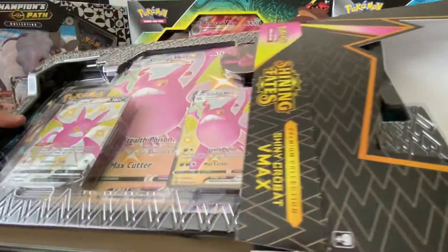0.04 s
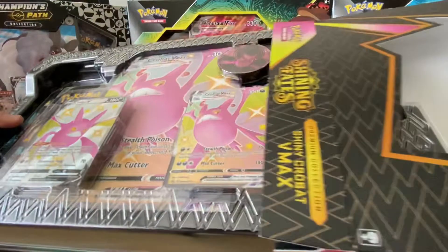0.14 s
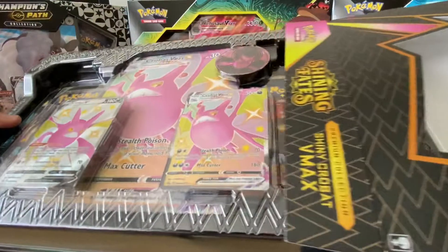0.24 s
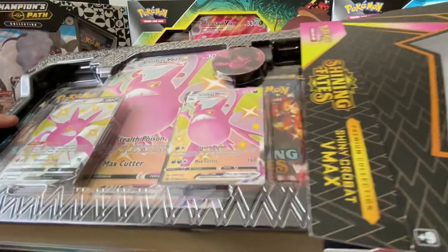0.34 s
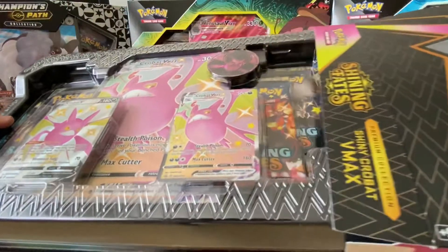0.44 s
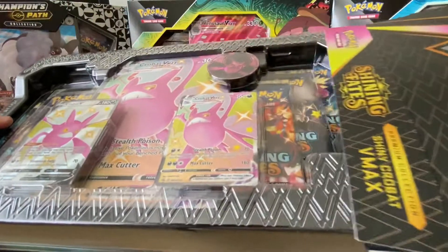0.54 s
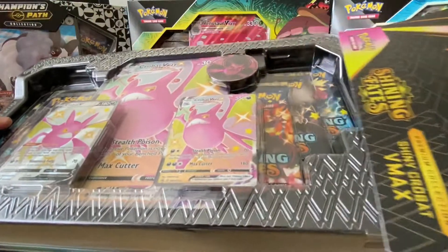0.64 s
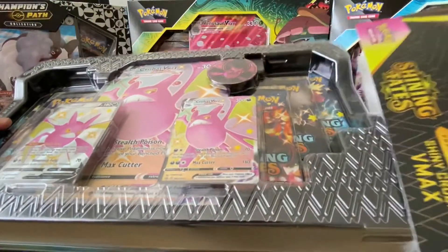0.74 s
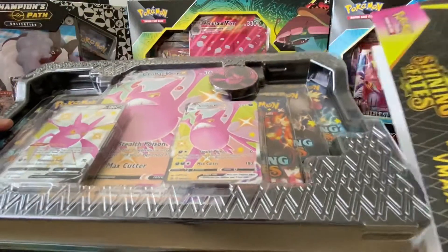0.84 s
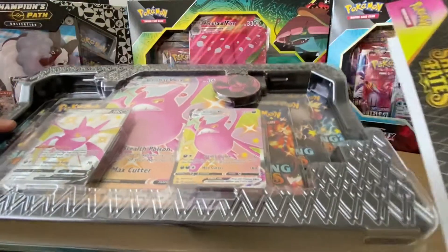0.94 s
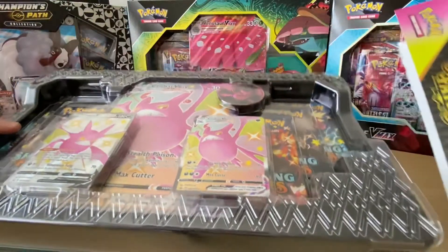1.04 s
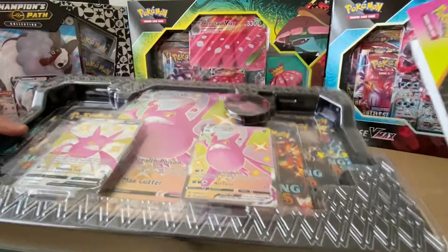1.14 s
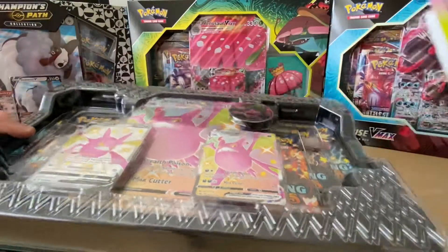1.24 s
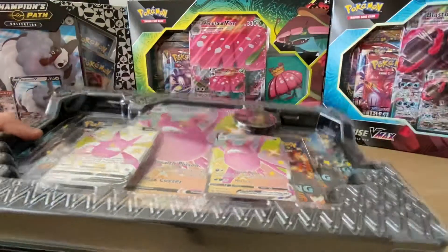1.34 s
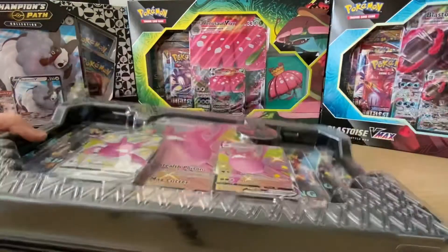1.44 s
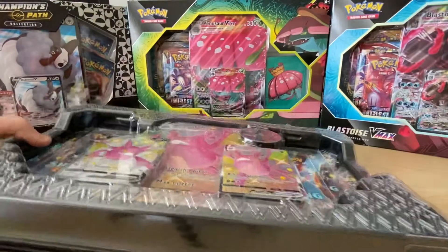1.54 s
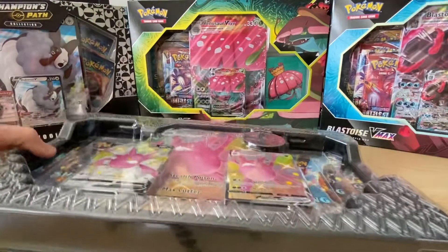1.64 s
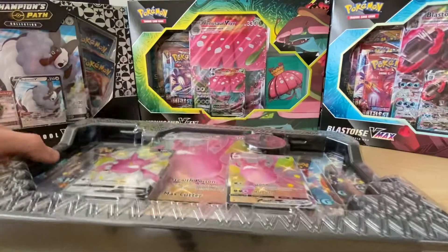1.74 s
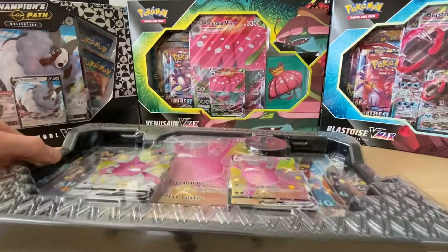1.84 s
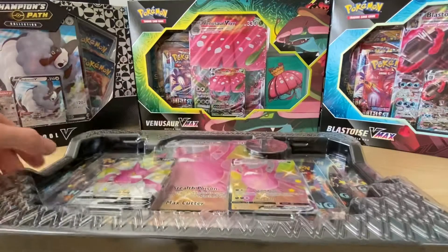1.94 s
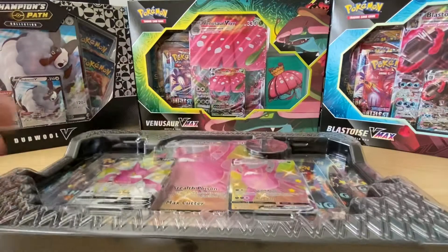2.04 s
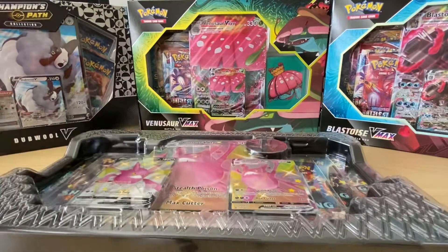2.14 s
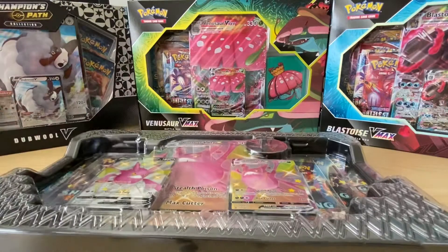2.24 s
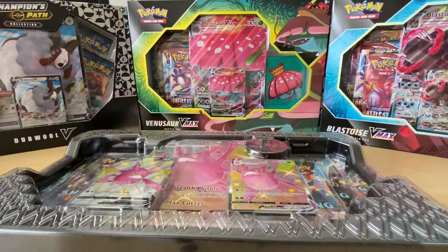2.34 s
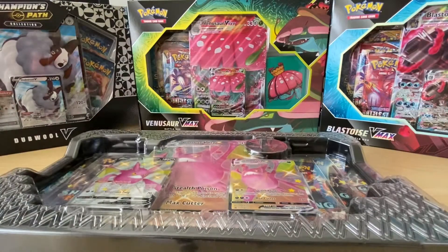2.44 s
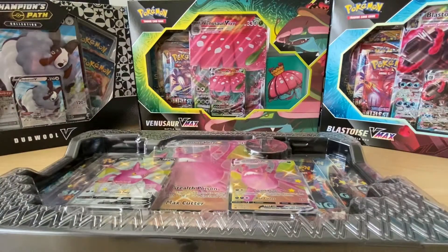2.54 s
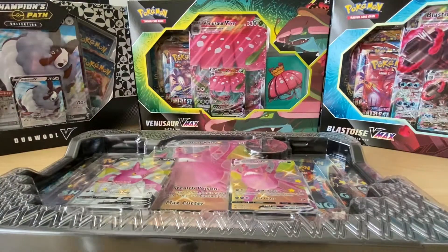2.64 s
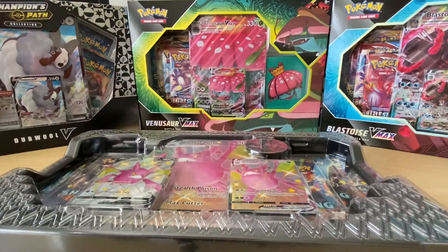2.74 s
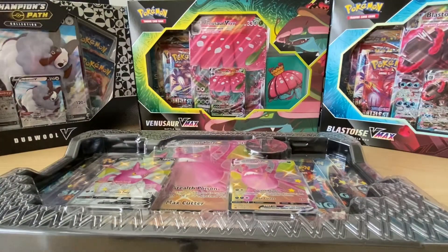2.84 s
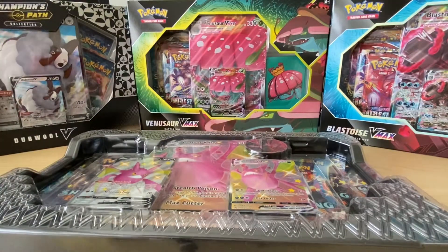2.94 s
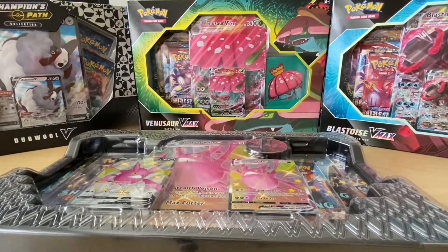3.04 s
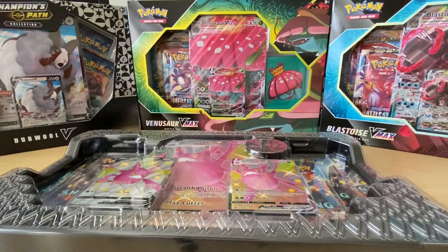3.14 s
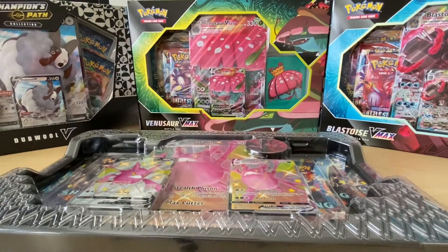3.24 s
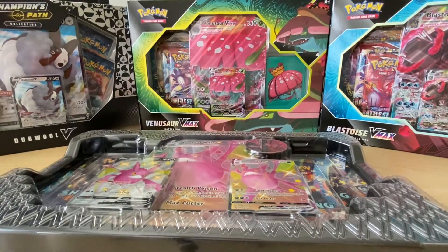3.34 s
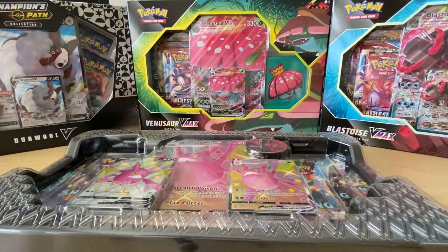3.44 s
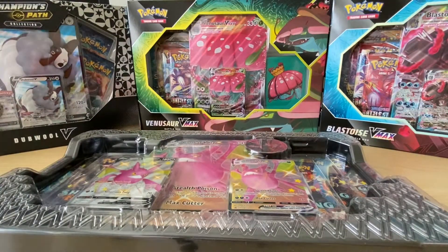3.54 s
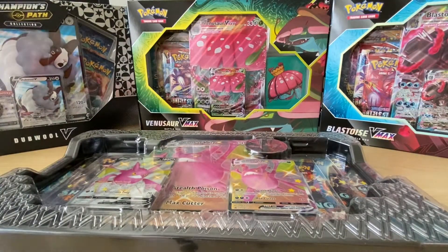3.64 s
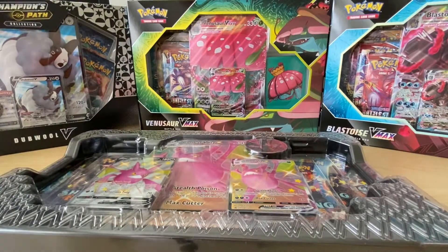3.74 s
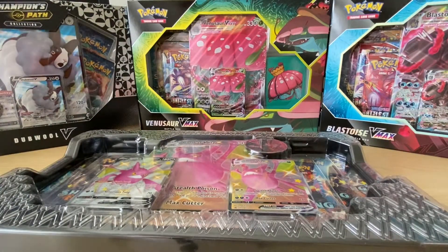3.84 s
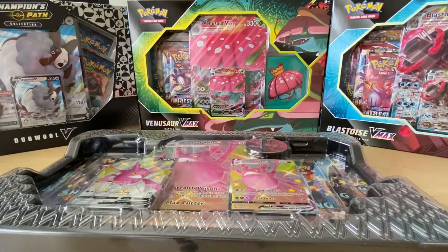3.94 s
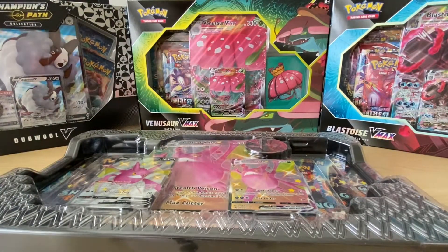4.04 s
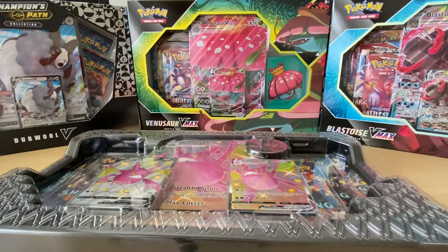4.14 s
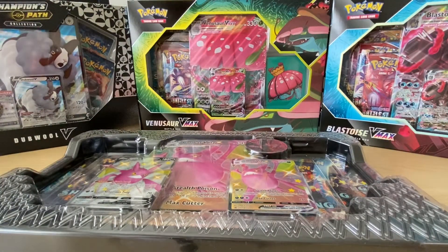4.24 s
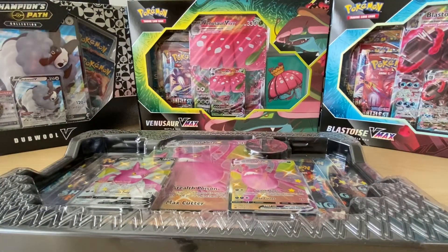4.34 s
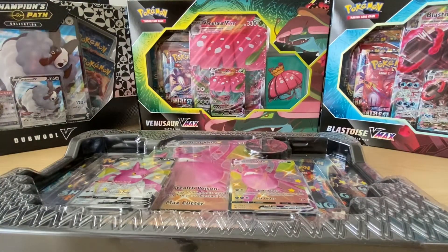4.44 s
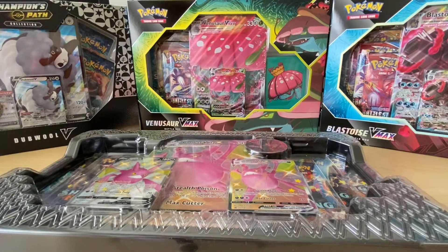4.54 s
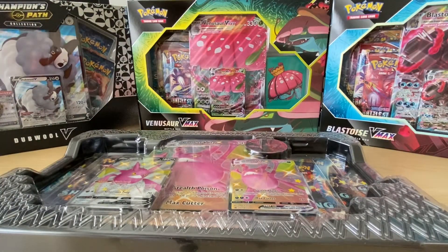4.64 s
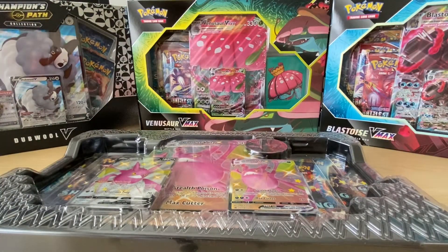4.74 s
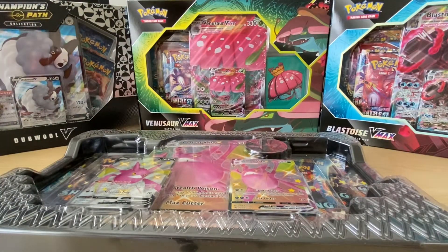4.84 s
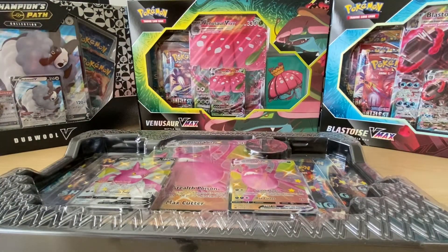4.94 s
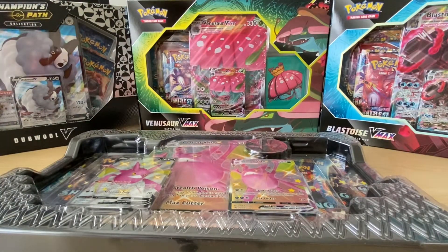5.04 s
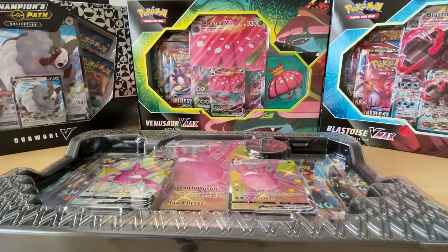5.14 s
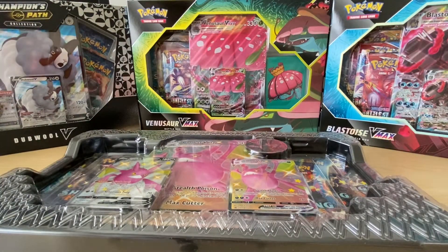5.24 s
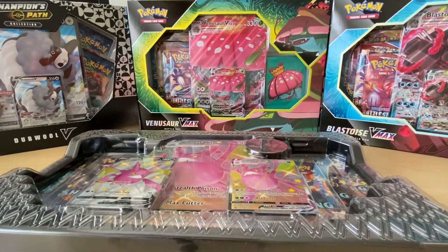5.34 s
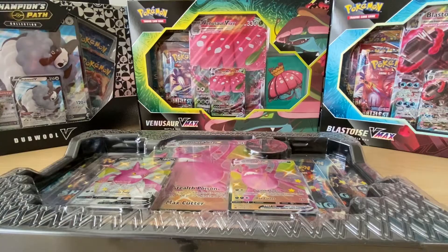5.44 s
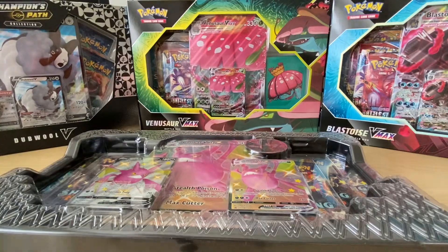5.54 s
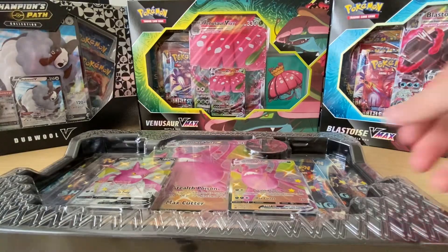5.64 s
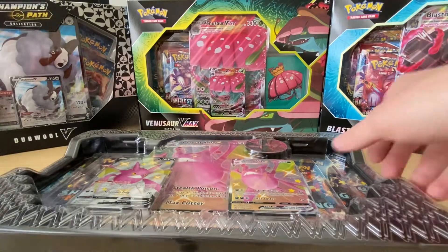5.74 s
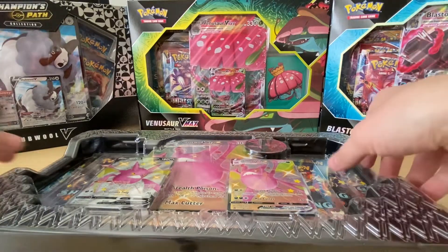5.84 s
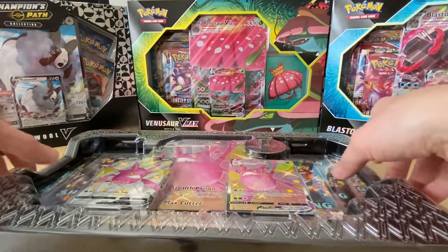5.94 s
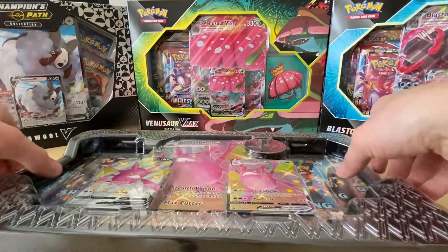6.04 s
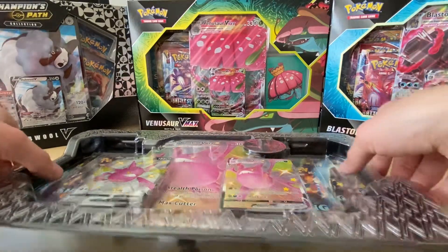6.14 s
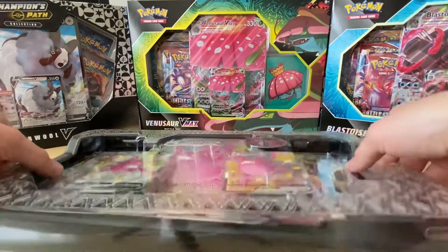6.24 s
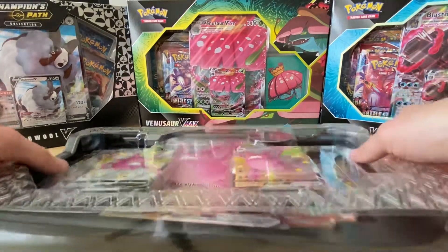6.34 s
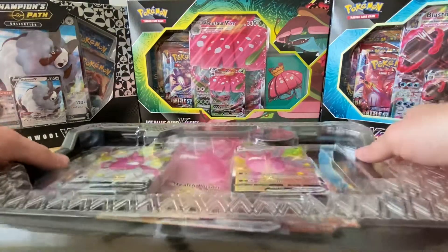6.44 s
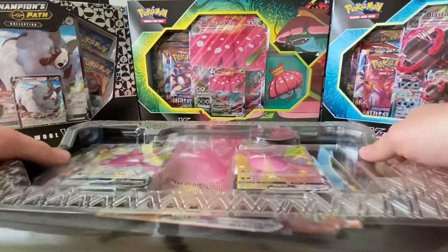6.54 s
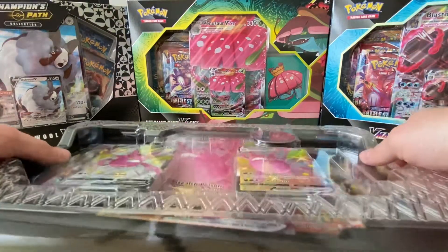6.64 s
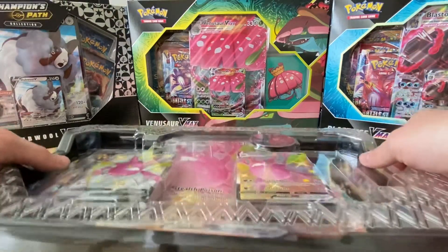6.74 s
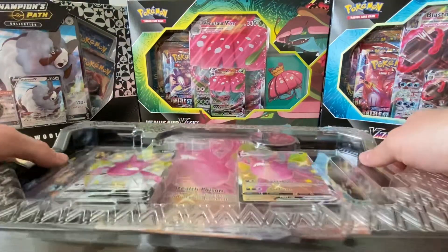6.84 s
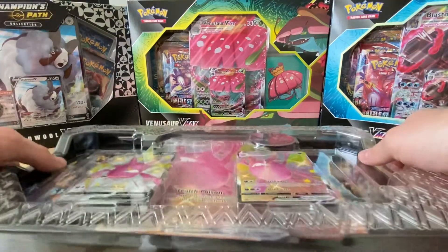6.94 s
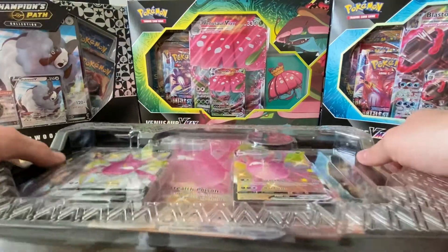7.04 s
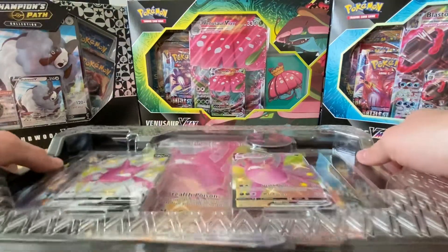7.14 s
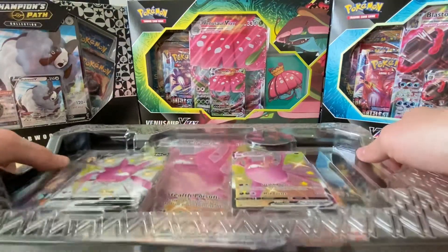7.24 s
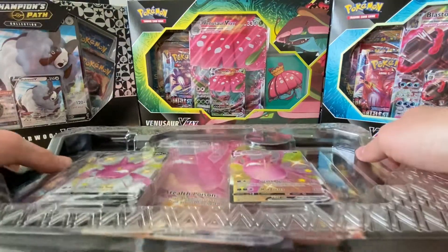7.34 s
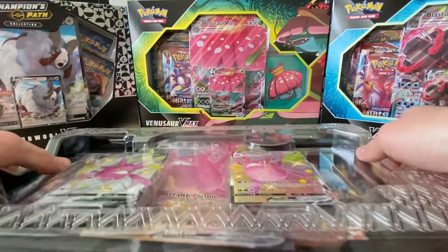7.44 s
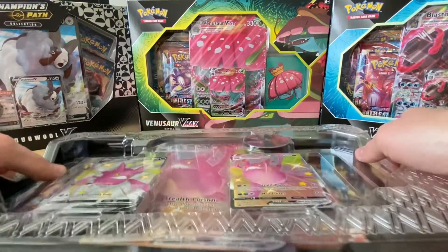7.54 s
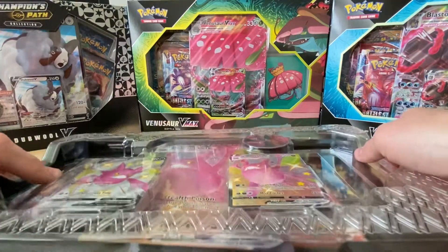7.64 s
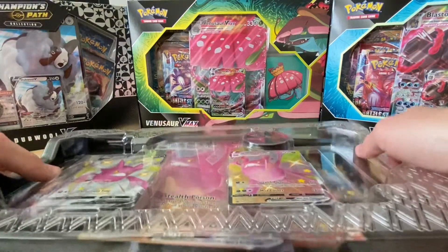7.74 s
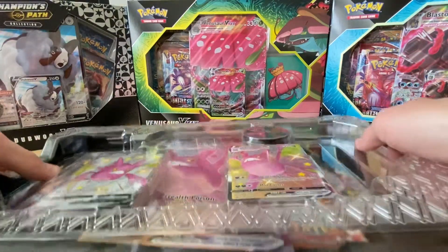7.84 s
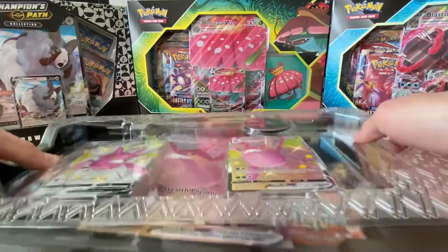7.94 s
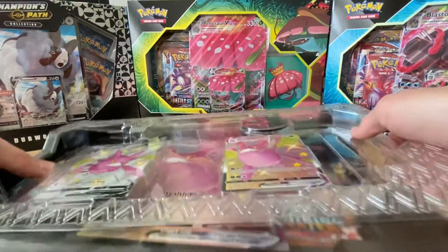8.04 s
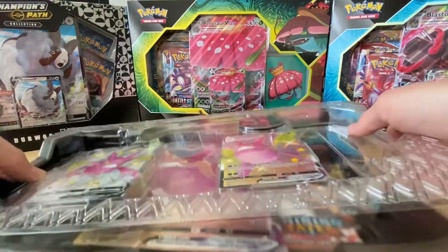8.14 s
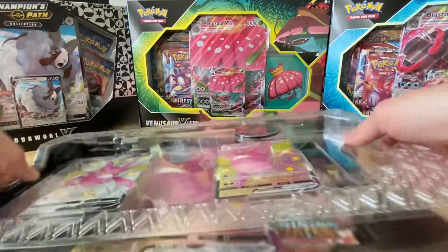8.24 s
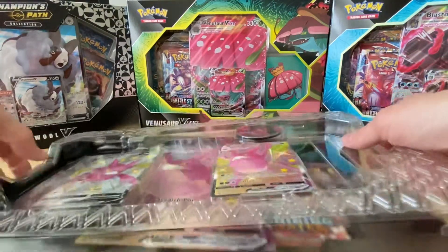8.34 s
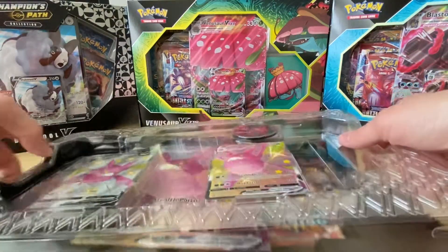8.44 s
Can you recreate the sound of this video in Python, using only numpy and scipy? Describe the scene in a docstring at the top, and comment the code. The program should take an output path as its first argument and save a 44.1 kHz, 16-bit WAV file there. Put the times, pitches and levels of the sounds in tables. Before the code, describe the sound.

A stiff plastic tray slides out of a cardboard sleeve with a dry, hissing scrape and a sharp knock. The sleeve is dragged and bumped about, giving hollow knocks, brief scuffs and low thuds on a table. Then fingers pry at the tray's lid, which rubs, ticks and pops in irregular snaps. It is all heard close up in stereo in a small, quiet room.

```python
"""A plastic tray and its cardboard sleeve

A stiff tray is drawn out of its sleeve and set on a table; the sleeve is knocked about and put away
to one side, then fingers pry at the tray's lid, which snaps and creaks. Friction is a dense train of
micro-slips, heard as rasp, rumble and hiss. Knocks and snaps are bursts of force that excite the damped
modes of card, plastic and table. Two spaced microphones listen in a small, quiet room."""
import sys
import numpy as np
from scipy import signal
from scipy.fft import rfft, irfft, next_fast_len
from scipy.io import wavfile
from scipy.ndimage import uniform_filter1d, map_coordinates

SR = 44100
rng = np.random.default_rng(int(sys.argv[2]) if len(sys.argv) > 2 else 0)


def bounce(signal):
    """Save signal as a 16-bit WAV file at the path given by the first command-line argument."""
    frames = np.transpose(np.atleast_2d(signal))
    limited = np.clip(frames, -1, 1)
    pcm = np.round(limited * 32767).astype(np.int16)
    wavfile.write(sys.argv[1], SR, pcm)


N = 373652

# Normal modes. Each row: frequency in Hz, bandwidth in Hz, level in dB.
TABLE_MODES = [(57, 6.4, -18), (84, 33, -1), (131.8, 16.6, 2.5), (167, 27, -2), (220, 16, 1.5),
               (264.4, 162, -6.5)]
CARD_MODES = [(313.7, 26, 0), (373.7, 23.3, 5), (425.1, 40, 4.5), (477.2, 22.5, 3.5), (521.2, 45, 1.5),
              (577.2, 24, 2), (726, 15, -17), (825.5, 133, 2), (1057.4, 350, -1), (1261, 61, 0),
              (1430, 210, -4.5), (2073, 140, -0.5), (2750, 250, -1)]
PLASTIC_MODES = [(493.2, 74, 2), (615.3, 65, 7), (921, 107, 7.5), (1066.7, 170, 0.5), (1240, 20, 0),
                 (1385, 53, -6), (1603, 300, -7), (2330, 330, -3), (3250, 400, 8.5)]
# Noise spectra. Each row: frequency in Hz, gain in dB.
AIR_SPECTRUM = [(18, -45), (30, 7), (122, -4), (296, -5), (346, -8.5), (394, 0), (905, -13), (1340, -5.5),
                (1440, -12.5), (3070, -31), (9640, -29), (13900, -66), (15000, -59)]
RASP_SPECTRUM = [(120, -67.5), (200, -8.5), (275, 3), (452, 2), (720, 8), (934, 2.5), (1180, 5),
                 (3000, -12.5), (3900, -39.5), (6600, -120)]
HISS_SPECTRUM = [(600, -44), (1180, -7), (2000, -3), (2140, -0.5), (3020, -4.5), (4060, -6.5), (6620, -6.5),
                 (7450, -12.5), (8820, -9.5), (12700, -14.5), (14100, -18.5), (15000, -57)]
CARD_CRACK_SPECTRUM = [(500, -33), (1180, -1), (2000, -12), (2240, -8), (3150, -18.5), (3670, -11),
                       (5890, -13.5), (6520, -12.5), (13200, -25), (15500, -54.5)]
SCUFF_SPECTRUM = [(500, -19), (1180, 0.5), (2600, -7), (3350, -2), (3900, -9), (5900, -10.5), (7850, -9.5),
                  (9050, -7.5), (9950, 3), (10850, -10), (13300, -18), (14200, -61)]
PLASTIC_CRACK_SPECTRUM = [(600, -40), (1180, -9), (2000, -0.5), (3100, -6), (4400, -4.5), (7660, -4.5),
                          (13100, -10.5), (15000, -26), (16300, -39)]
# The tray sliding out, with one catch on the way, and the fingers working at the lid.
# Each row: time in seconds, then rasp, rumble and hiss levels in dB.
TRAY_PULL = [(0.0, -42.5, -53, -44), (0.12, -42.5, -58, -44), (0.22, -40.5, -60, -43.5),
             (0.26, -43.5, -67, -39.5), (0.33, -38, -64, -39.5), (0.385, -40, -59.5, -39),
             (0.41, -36, -65, -41), (0.46, -44.5, -58.5, -47.5), (0.57, -46, -58, -49.5),
             (0.64, -40.5, -73.5, -41.5), (0.7, -37, -49, -37.5), (0.78, -36, -43.5, -30.5),
             (0.815, -29, -37, -37.5)]
LID_GRIP = [(5.893, -43, -45.5, -46), (5.97, -62.5, -52, -68), (6.1, -45.5, -52, -50.5),
            (6.29, -44.5, -60, -53), (6.48, -59.5, -65, -72.5), (6.73, -48.5, -59, -62),
            (6.9, -53.5, -64, -60.5), (7.07, -49.5, -56, -59), (7.35, -53, -56.5, -57.5),
            (7.47, -47, -56, -56.5), (7.68, -52, -51, -54), (7.79, -52.5, -68, -59.5),
            (7.9, -51, -50.5, -67), (8.11, -48.5, -45.5, -56), (8.22, -50, -51, -45),
            (8.36, -48, -41.5, -56.5), (8.47, -45, -52, -41.5)]
# Strokes of the dragged sleeve. Each row: start and length in seconds, first and last rasp level in dB,
# rumble and hiss in dB above the rasp.
SLEEVE_DRAGS = [(1.123, 0.03, -68, -65, 13.5, -24), (1.21, 0.68, -57.5, -54, -5, -3.5),
                (1.48, 0.26, -67, -43.5, -14, -1.5), (1.79, 0.098, -54, -31.5, -18, -1.5),
                (2.424, 0.097, -53, -42.5, -15, -7.5), (2.63, 0.11, -31, -56, -7, -12.5),
                (2.77, 0.096, -43, -46, -7, -7.5), (3.171, 0.092, -39.5, -48.5, -20, -2.5),
                (4.05, 0.54, -64.5, -78, -3, 1.5), (4.6, 0.31, -61.5, -68, 3, -4.5),
                (5.13, 0.095, -53, -44, 0.5, -3), (5.274, 0.11, -40.5, -43, 0, -9.5),
                (5.649, 0.31, -68, -80, 20, 6)]
# Hands barely moving. One row: rasp, rumble and hiss levels in dB.
RESTING_HANDS_DB = (-72.5, -66.5, -80.5)
# The sleeve's mouth singing as the tray leaves, and fingers squeaking on the lid.
# Each row: time in seconds, level in dB, centre frequency in Hz.
SLEEVE_SCRAPE = [(0.0, -61, 4300), (0.2, -54, 4000), (0.34, -49, 4800), (0.45, -59, 4100),
                 (0.66, -58, 3300), (0.72, -50, 3700), (0.8, -41, 5000)]
LID_SQUEAK = [(5.76, -73, 11700), (5.81, -69, 11600), (5.88, -65, 11500), (5.95, -62, 11700),
              (6.0, -69, 11300), (6.05, -63, 11500), (6.1, -72, 11500)]
# Card and tray bumping. Each row: time in seconds, ring peak in dB, relative thud and crack levels in dB,
# ring and thud pitches in Hz, contact time in ms, purity of the ring in dB per octave.
KNOCKS = [(0.547, -30, -60, -52, 700, 250, 4.3, -6), (0.592, -9.5, -39, -33.5, 500, 299, 5.8, 0),
          (0.661, -24, -45, -41, 800, 250, 12, 10), (0.789, -29, -60, -31, 800, 214, 14, 6),
          (0.811, -19, -31, -33, 1040, 192, 8.6, -3), (1.117, -31.5, -49, -47, 455, 99, 17, 6.5),
          (1.235, -45, -56, -57, 800, 155, 6.3, 12), (1.253, -35, -59, -64, 574, 155, 7.6, 13),
          (1.3, -35.5, -66, -57, 1200, 155, 2.7, 8), (1.44, -23.5, -30, -39.5, 301, 288, 5.5, 2),
          (1.519, -45, -45.5, -50, 586, 150, 11, 19), (1.725, -34.5, -48.5, -51, 606, 280, 9.2, 18),
          (1.872, -18.5, -29.5, -30, 366, 237, 29, 7), (1.896, -11, -23.5, -51, 312, 272, 5.9, 12.5),
          (2.415, -21, -37.5, -40, 452, 130, 45, 5.5), (2.527, -28, -30.5, -35, 410, 89, 10.3, 27),
          (2.611, -18, -37, -28, 900, 155, 19, 5), (2.619, -7, -35, -35, 510, 130, 18.3, 14),
          (3.165, -20, -23, -32, 427, 120, 23.6, 19), (3.284, -34, -58, -40.5, 493, 134, 32, 2),
          (4.101, -37, -52, -60, 355, 252, 18, 2), (4.592, -30, -43.5, -51.5, 437, 213, 26, 6),
          (4.767, -38, -51.5, -56, 412, 56.5, 26, 4), (5.079, -24, -35.5, -49.5, 370, 157, 36, 3.5),
          (5.255, -37, -52, -59, 423, 217, 63, 29), (5.308, -20.5, -34, -40.5, 408, 246, 20, 28),
          (5.36, -30.5, -45, -64, 426, 242, 93, 42), (5.642, -38, -58, -51.5, 606, 242, 19, 12),
          (5.716, -37.5, -51, -70, 580, 225, 8.1, 23), (6.336, -53, -39, -48, 301, 143, 5.6, 1),
          (8.266, -18, -36.5, -43, 563, 250, 4.7, 15)]
# The table top under heavier bumps. Each row: start in seconds, peak in dB, pitch in Hz, decay in ms.
TABLE_SWAYS = [(0.825, -43, 71.5, 30), (1.136, -44, 76.5, 37), (1.444, -50, 71, 20),
               (1.892, -26.5, 54.6, 18.6), (2.523, -26, 57.5, 25), (3.168, -26, 52.6, 33),
               (4.599, -46, 55.6, 43), (4.768, -46, 52, 18), (5.09, -41, 61.4, 78), (5.32, -37.5, 58.7, 36),
               (8.269, -36, 44.7, 17)]
# Glossy card slipping. Each row: start in seconds, relative level in dB, decay in ms.
CARD_SCUFFS = [(2.826, -31.5, 60), (3.0795, -38, 49), (4.045, -41, 127), (4.262, -42, 24),
               (4.6094, -42.5, 56), (5.147, -39, 51)]
# The plastic buckling. Each row: time in seconds, ring peak in dB, relative crack level in dB,
# ring pitch in Hz, contact time in ms, tilt of the crack in dB per octave.
SNAPS = [(3.479, -51, -73, 1180, 3.8, 1), (3.756, -75, -64, 434, 18, 0), (3.926, -48, -59.5, 433, 40, -3),
         (5.891, -23, -49, 950, 10, 4), (5.906, -35, -32.5, 303, 22, 0.5), (5.924, -34, -51, 600, 6.2, -5),
         (6.228, -37, -47, 923, 3.6, 5), (6.237, -26, -33.5, 930, 8.9, -5.5), (6.428, -37, -46, 665, 6, -7),
         (6.438, -22, -33, 680, 24, -6.5), (6.678, -24, -29.5, 930, 10, 0),
         (6.757, -19.5, -34, 910, 11, 1.5), (6.763, -18.5, -32, 915, 7.3, -3),
         (6.792, -14, -24.5, 637, 6.9, -3.5), (7.058, -28.5, -46, 945, 16, -6),
         (7.146, -10.5, -30, 850, 10, 0), (7.182, -22.5, -26.5, 1010, 8.2, 1.5),
         (7.331, -25.5, -24, 900, 7.3, 0.5), (7.455, -16.5, -33, 915, 20, -1),
         (7.467, -29, -31.5, 910, 13, -6), (7.549, -34, -44, 538, 3.5, -5), (7.577, -15, -36, 940, 5.1, -4),
         (7.582, -4, -13, 950, 7.8, -1), (7.708, -25, -34.5, 860, 11.7, -0.5),
         (7.801, -24, -33.5, 640, 16, -7.5), (7.96, -32, -66, 598, 5.5, -2),
         (8.006, -32, -50.5, 1020, 14, -1), (8.132, -33.5, -51, 503, 18.5, 6),
         (8.171, -18, -32.5, 1050, 20, 7)]
# Where the hands work. Each row: time in seconds, lag of left behind right in ms, left minus right in dB.
HAND_POSITIONS = [(0, 0.18, -1.5), (0.6, 0.23, -2.5), (1.4, 0.26, 0.5), (1.6, -0.14, 2), (2.5, -0.41, 1),
                  (3.2, -0.31, 0.5), (5.4, -0.38, 1), (5.6, 0.33, -1.5), (7, 0.352, 0.9), (7.2, -0.37, 1),
                  (7.6, 0.35, 0.5), (8.47, 0.18, -1.5)]
# Decay of the room. Each row: frequency in Hz, reverberation time in seconds.
ROOM_T60 = [(100, 0.39), (500, 0.26), (2000, 0.28), (12000, 0.22)]


def undb(db):
    """Amplitude grows tenfold for every 20 dB."""
    return 10 ** (np.asarray(db) / 20)


def unit(x):
    """Normalisation to an rms of 1."""
    return x / np.sqrt(np.mean(x ** 2))


def colour(x, gain):
    """Filtering multiplies the spectrum by a gain function of frequency."""
    n = next_fast_len(x.shape[-1])
    return irfft(rfft(x, n) * gain(np.arange(n // 2 + 1) * SR / n + 1), n)[..., :x.shape[-1]]


def shape(points):
    """A spectral envelope through (Hz, dB) points, closed outside them."""
    hz, db = np.transpose(points)
    return lambda f: undb(np.interp(np.log(f), np.log(hz), db, -80, -80))


def resonance(f, hz, width):
    """A damped oscillator responds most at its natural frequency."""
    return 1 / (1 + 1j * (f / hz - hz / f) * hz / width)


def modal_response(modes):
    """By superposition, a body's response is the sum of its resonances."""
    return lambda f: sum(undb(db) * resonance(f, hz, width) for hz, width, db in modes)


def sheet_peaks(depth_db, width_hz):
    """The crowded modes of a stiff sheet ripple its response with many small peaks."""
    peaks = 1.5 * np.tanh(rng.standard_normal(400) / 1.5)
    return lambda f: undb(depth_db * np.interp(f / width_hz, np.arange(len(peaks)), peaks))


def wander(rate):
    """A random fluctuation with a spread near 1, gliding to `rate` new values a second."""
    hold = int(SR / rate)
    return 1.22 * uniform_filter1d(np.repeat(rng.standard_normal(N // hold + 1), hold), hold)[:N]


def curves(table):
    """Linear interpolation gives each column of a timed table at every sample."""
    times, *columns = np.transpose(table)
    return [np.interp(np.arange(N) / SR, times, column) for column in columns]


def air():
    """Room murmur and microphone hiss form a noise floor, coherent only in the bass."""
    mid, side = colour(rng.standard_normal((2, N)), shape(AIR_SPECTRUM))
    side = colour(side, lambda f: np.minimum(.5 + f / 900, 1.1))
    return undb(-64.5 + 0.08 * wander(0.96)) * np.array([mid + side, mid - side]) / np.std(mid)


def micro_slips(spread_db, shared):
    """Friction is a dense train of uneven slips, partly coherent between the microphones."""
    common, own = rng.standard_normal(N), rng.standard_normal((2, N))
    size = uniform_filter1d(rng.exponential(size=N // 32 + 1).repeat(32)[:N], size=32)
    return undb(spread_db * size) * (shared * common + np.sqrt(1 - shared ** 2) * own)


def stroke(start, end, levels_db):
    """Friction sounds while there is motion: its gain rises quickly and dies when the hand stops."""
    t = np.arange(N) / SR
    rise_db_per_s, fall_db_per_s = 909, 513
    fade_db = rise_db_per_s * np.maximum(start - t, 0) + fall_db_per_s * np.maximum(t - end, 0)
    return undb(levels_db - fade_db)


def hand_gains():
    """The strokes add up to three envelopes: rasp, rumble and hiss."""
    moves = sum(stroke(move[0][0], move[-1][0], np.array(curves(move))) for move in (TRAY_PULL, LID_GRIP))
    gains = undb(RESTING_HANDS_DB)[:, None] + moves
    for start, length, from_db, to_db, rumble_db, hiss_db in SLEEVE_DRAGS:
        end = start + length
        rasp_db, = curves([(start, from_db), (end, to_db)])
        gains += stroke(start, end, rasp_db) * undb([[0], [rumble_db], [hiss_db]])
    return gains


def rubbing():
    """Slips under uneven pressure excite the card (rasp), the table (rumble) and the surface (hiss)."""
    rasp_gain, rumble_gain, hiss_gain = hand_gains()
    pressure = wander(40)
    card = modal_response(CARD_MODES)
    rasp = colour(micro_slips(0.49, shared=0.54), lambda f: shape(RASP_SPECTRUM)(f) * (1 + 0.12 * card(f)))
    rumble = colour(micro_slips(3.0, shared=0.85), modal_response(TABLE_MODES))
    blend = 1.3 * wander(7)  # the peaks of the sheet shift as the contact travels
    sheets = [colour(micro_slips(0.9, shared=0.11),
                     lambda f: shape(HISS_SPECTRUM)(f) * sheet_peaks(4.5, 110)(f)) for _ in range(2)]
    hiss = np.cos(blend) * sheets[0] + np.sin(blend) * sheets[1]
    return (unit(rasp) * rasp_gain * undb(3.0 * pressure)
            + unit(rumble) * rumble_gain * undb(wander(9.1))
            + unit(hiss) * hiss_gain * undb(1.4 * pressure))


def moving_contact(x, depth_db, rate):
    """Excitation depends on the point of contact, so each third octave swells and fades alone."""
    n = next_fast_len(N)
    spectrum = rfft(x, n)
    thirds = 3 * np.log2((np.arange(n // 2 + 1) * SR / n + 1) / 400)  # counted from 400 Hz
    out = irfft(spectrum * np.clip(-thirds, 0, 1), n)[:, :N]
    for k in range(17):
        band = irfft(spectrum * np.clip(1 - np.abs(thirds - k), 0, 1), n)[:, :N]
        out += band * undb(depth_db * wander(rate))
    return out


def friction_whistle(table, width_hz):
    """Narrow-band friction noise: a gliding tone whose amplitude is modulated by slow noise."""
    db, hz = curves(table)
    wobble = unit(colour(rng.standard_normal((2, N)), lambda f: 1 / (1 + (2 * f / width_hz) ** 2)))
    tone = np.sqrt(2) * np.sin(2 * np.pi * np.cumsum(hz) / SR)
    return wobble * tone * stroke(table[0][0], table[-1][0], db)


def near_pitch(modes, hz, db_per_octave):
    """Selective excitation: modes far from the pitch of a blow are struck less, in dB."""
    return -db_per_octave * np.abs(np.log2(np.array(modes)[:, 0] / hz))


def strike(force, modes, strike_db, phase_spread, roughness):
    """A partly rough force drives each mode; each microphone sees the mode at its own phase."""
    n = len(force)
    f, t = np.arange(n // 2 + 1) * SR / n + 1, np.arange(n) / SR
    hz, width, db = np.transpose(modes)[:, :, None]
    swing = np.cos(2 * np.pi * (hz * t + rng.random((len(modes), 1))))
    responses = resonance(f, hz, width) / (1 + 1j * f / 3500) ** 2
    drive = rfft(force * swing) + roughness * rfft(force * rng.standard_normal(n))
    spectra = responses * drive
    gains = undb(db[:, 0] + strike_db) * np.linalg.norm(responses, axis=1) / np.linalg.norm(spectra, axis=1)
    phases = np.exp(1j * phase_spread * rng.standard_normal((2, len(modes))))
    return irfft(phases @ (spectra * gains[:, None]), n)


def impacts(rows, modes, crack_spectrum, scatter_db, detune, phase_spread, ring_delay,
            crack_speed, crack_length, shared):
    """A ragged burst of force cracks briefly, rings the modes near its pitch and thuds the table."""
    out, n, lead = np.zeros((2, N + SR)), 8000, 882
    ms = (np.arange(n) - lead) * 1000 / SR
    for time, ring_db, thud_db, crack_db, hz, thud_hz, contact_ms, purity, tilt in rows:
        rise_ms = max(8 + 1.4 * ring_db, 1)  # only the strongest blows take longer to build
        noise = rng.standard_normal((3, n))
        strike_db = scatter_db * rng.standard_normal(len(modes)) + near_pitch(modes, hz, purity)
        held = np.array(modes) * [1, 1 + 2.5 / contact_ms, 1]  # fingers damp the brief contacts
        held[:, 0] *= 1 + detune * rng.standard_normal(len(modes))  # the grip bends the panel out of tune
        ring_ms = ms - ring_delay * rise_ms
        ring_force = np.exp(np.minimum(2 * ring_ms / rise_ms, -ring_ms / contact_ms))
        thud_force = np.maximum(ms, 0) * np.exp(-ms / (0.66 * contact_ms))

        envelope = np.exp(np.minimum(crack_speed * ms / rise_ms, -ms / (crack_length * contact_ms)))
        # the crack comes in splinters of about a millisecond
        splinters = undb(4.6 * uniform_filter1d(rng.standard_normal(n // 50).repeat(50), size=50))
        burst = envelope * splinters * (shared * noise[0] + np.sqrt(1 - shared ** 2) * noise[1:])
        tint = sheet_peaks(4.0, 640)
        crack = colour(burst, lambda f: shape(crack_spectrum)(f) * tint(f) * undb(tilt * np.log2(f / 5000)))
        ring = strike(ring_force, held, strike_db, phase_spread, roughness=6.6)
        table_db = near_pitch(TABLE_MODES, thud_hz, db_per_octave=19)
        thud = strike(thud_force, TABLE_MODES, table_db, phase_spread=0.47, roughness=9.2)

        parts = [(ring, ring_db), (thud, thud_db + 9.5), (crack, crack_db + 12)]
        sound = sum(part * undb(db) / np.abs(part).max(axis=1, keepdims=True) for part, db in parts)
        i = int(time * SR) - lead
        out[:, i:i + n] += sound * np.hanning(2 * n)[n:]
    return out[:, :N]


def card_knocks():
    """Impact excites the damped modes of the cardboard; the crack has no added tilt."""
    return impacts([(*row, 0) for row in KNOCKS], CARD_MODES, CARD_CRACK_SPECTRUM,
                   scatter_db=2.5, detune=0.012, phase_spread=1.0, ring_delay=0.94,
                   crack_speed=1.03, crack_length=0.76, shared=0.07)


def table_sways():
    """A heavy bump sets the whole table top into a slow, strongly damped oscillation."""
    out, t = np.zeros((2, N + SR)), np.arange(SR // 3) / SR
    for start, db, hz, decay_ms in TABLE_SWAYS:
        phase = 0.87 * rng.standard_normal((2, 1))
        age = 1000 * t / decay_ms
        envelope = undb(db) * np.sqrt(2 * np.e * age) * np.exp(-age)
        i = int(start * SR)
        out[:, i:i + len(t)] += envelope * np.sin(2 * np.pi * hz * t + phase)
    return out[:, :N]


def card_scuffs():
    """Friction noise follows sliding speed: a smooth face slips suddenly and slows, with a thin hiss."""
    speed = 0
    for start, db, decay_ms in CARD_SCUFFS:
        ms = 1000 * (np.arange(N) / SR - start)
        speed += undb(db - 10) * np.clip(ms / 1.8, 0, 1) * np.exp(-np.abs(ms) / decay_ms)
    slips = micro_slips(1.1, shared=0.55)
    hiss = colour(slips, lambda f: shape(SCUFF_SPECTRUM)(f) * sheet_peaks(1.8, 150)(f))
    return speed * unit(hiss) * undb(2.4 * wander(35))


def plastic_snaps():
    """Buckling rings the plastic's modes; the table thuds at one pitch, growing less than the ring."""
    thud_hz, purity_db_per_octave = 263, 7.5
    rows = [(time, ring_db, -32.5 + 0.63 * ring_db, crack_db, hz, thud_hz, ms, purity_db_per_octave, tilt)
            for time, ring_db, crack_db, hz, ms, tilt in SNAPS]
    return impacts(rows, PLASTIC_MODES, PLASTIC_CRACK_SPECTRUM,
                   scatter_db=1.0, detune=0.0353, phase_spread=0.93, ring_delay=0.65,
                   crack_speed=1.7, crack_length=0.53, shared=0.53)


def lid_ticks():
    """Creases in the lid give way one by one: a Poisson train of tiny dry clicks of uneven size."""
    per_second, spread_db, decay_ms, centre_hz, octaves = 45, 14, 1.5, 3160, 0.9
    chance, weakness = rng.random((2, N))
    clicks = (chance < per_second / SR) * undb(-spread_db * weakness)
    bursts = signal.lfilter([1], [1, -np.exp(-1000 / SR / decay_ms)], clicks) * rng.standard_normal(N)
    ticks = unit(colour(bursts, lambda f: np.exp(-(np.log2(f / centre_hz) / octaves) ** 2)))
    rasp_db = curves(LID_GRIP)[0]
    return ticks * stroke(LID_GRIP[0][0], LID_GRIP[-1][0], rasp_db - 19)


def spaced_pair(x):
    """Unequal paths to two microphones give differences of arrival time and level."""
    lag_ms, pan_db = curves(HAND_POSITIONS)
    half_lag = lag_ms * SR / 2000
    return np.array([map_coordinates(channel, [np.arange(N) - side * half_lag], order=3)
                     * undb(side * pan_db / 2) for channel, side in zip(x, (1, -1))])


def reverberation(x):
    """A diffuse field, unrelated left and right, decays exponentially; the treble dies first."""
    t, tail = np.arange(SR // 2) / SR, 0
    room_hz, room_t60 = np.transpose(ROOM_T60)
    for hz in 70 * 2. ** np.arange(8):
        t60 = np.interp(np.log(hz), np.log(room_hz), room_t60)
        band = colour(rng.standard_normal((2, len(t))), lambda f: np.exp(-2 * np.log2(f / hz) ** 2))
        tail += band * undb(-60 * t / t60) / np.sqrt(t60)
    tail *= t > .004  # the first echo arrives after 4 ms
    tail /= np.linalg.norm(tail, axis=1, keepdims=True)
    return signal.fftconvolve(x.mean(axis=0, keepdims=True), tail, axes=1)[:, :N]


def scene():
    """Superposition of the direct sound of hands, card and plastic, its echoes and the noise floor."""
    knocks, snaps = card_knocks(), plastic_snaps()
    friction = moving_contact(rubbing(), depth_db=2.26, rate=25) + card_scuffs()
    ticks, sways = lid_ticks(), table_sways()
    squeak = friction_whistle(LID_SQUEAK, width_hz=250)
    scrape = friction_whistle(SLEEVE_SCRAPE, width_hz=340)
    direct = spaced_pair(friction + scrape + knocks + sways + snaps + squeak + ticks)
    return direct + undb(-7) * reverberation(direct) + air()


def record(dry):
    """Band limiting: the microphones lose the deepest bass and the recorder cuts the top."""
    low_hz, top_hz = 47.4, 16300
    thin = signal.sosfilt(signal.butter(4, low_hz, "high", fs=SR, output="sos"), dry)
    return signal.sosfilt(signal.ellip(10, .2, 80, top_hz, fs=SR, output="sos"), thin)


dry = scene()
out = record(dry)
bounce(out)
```